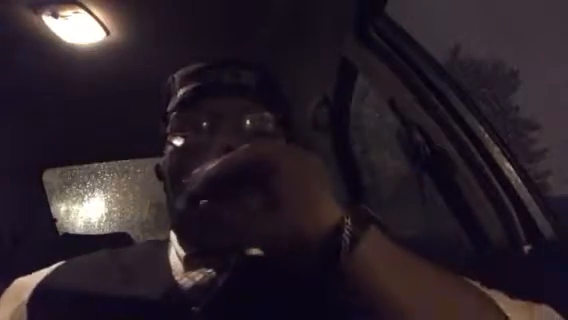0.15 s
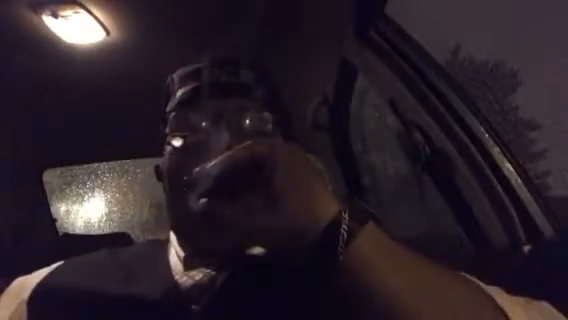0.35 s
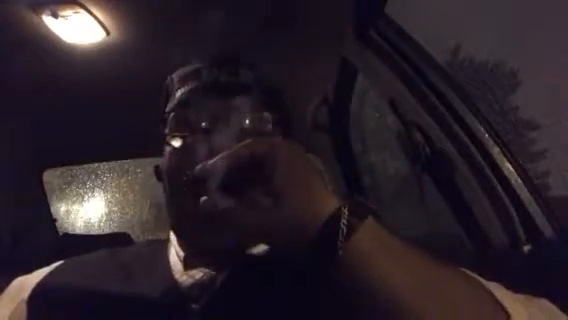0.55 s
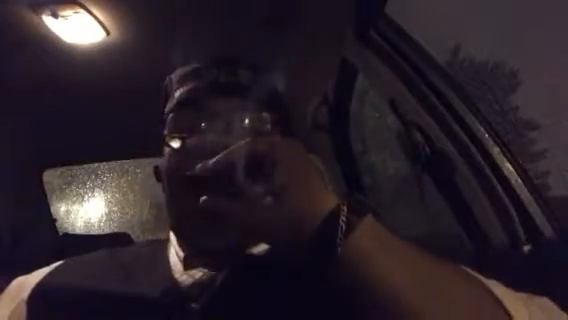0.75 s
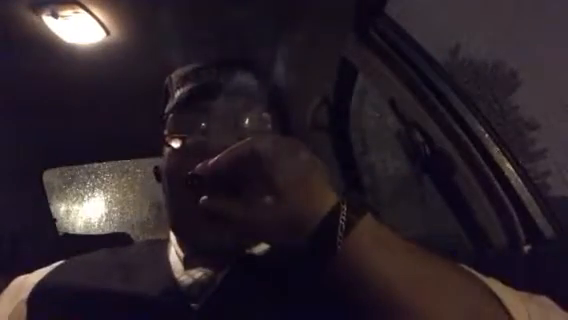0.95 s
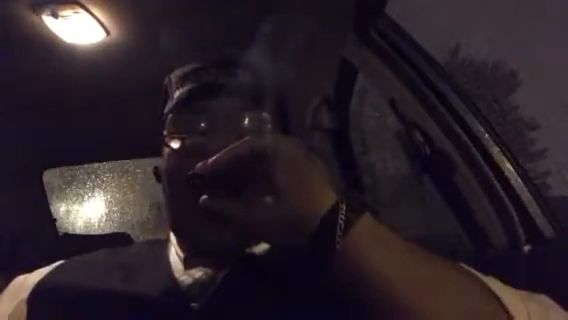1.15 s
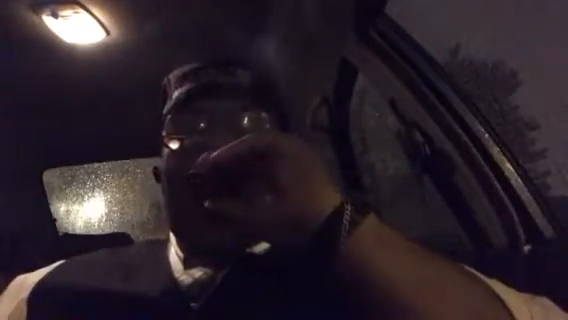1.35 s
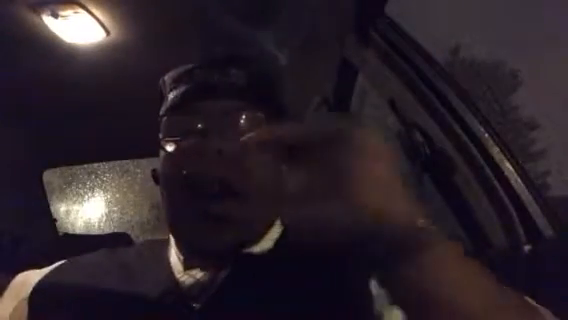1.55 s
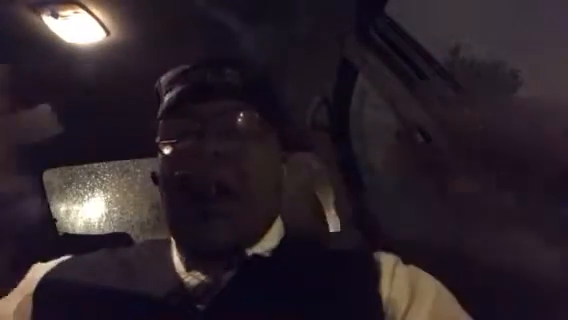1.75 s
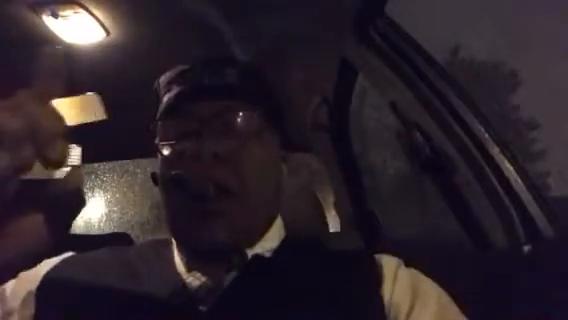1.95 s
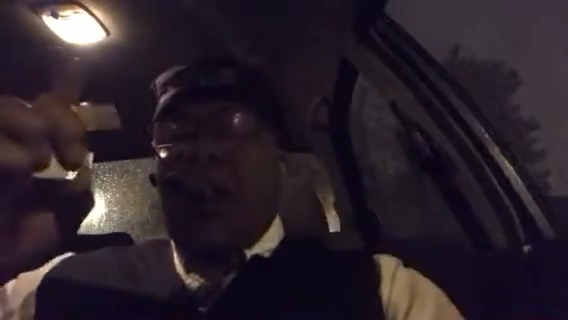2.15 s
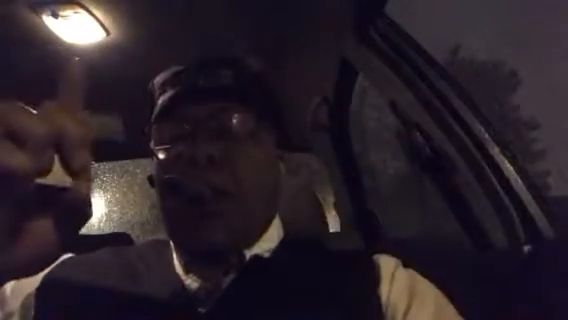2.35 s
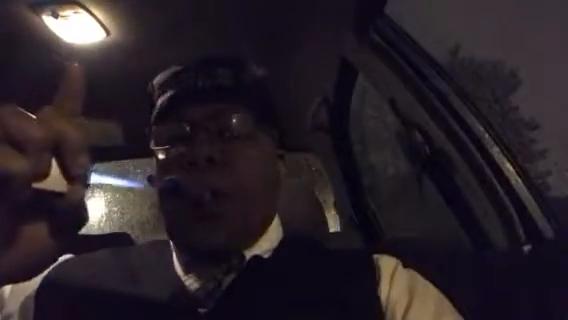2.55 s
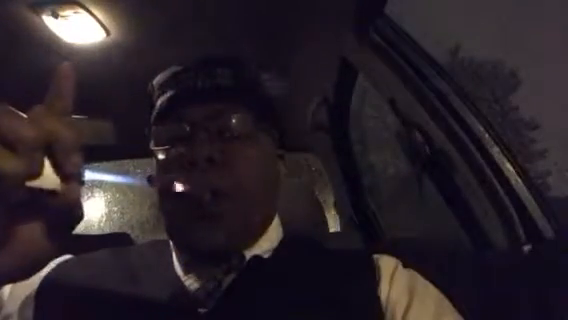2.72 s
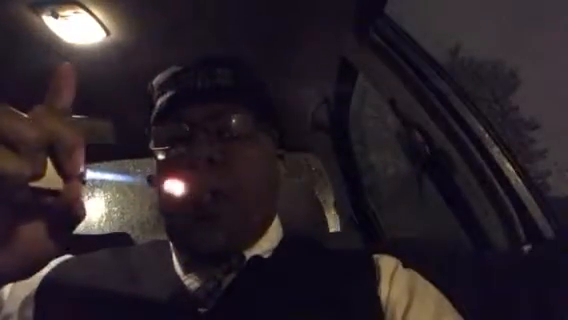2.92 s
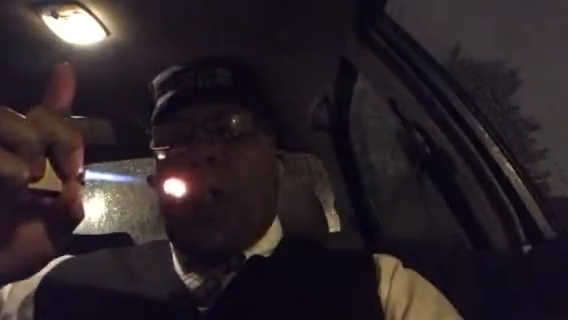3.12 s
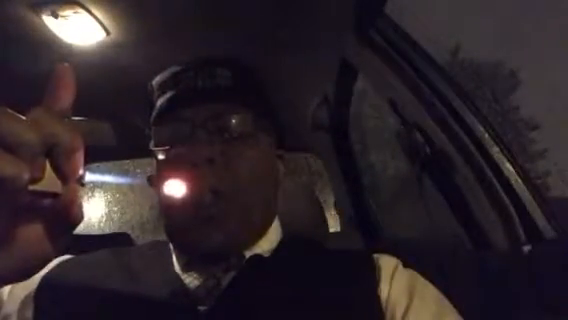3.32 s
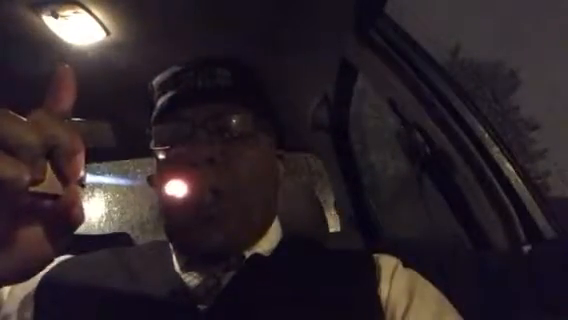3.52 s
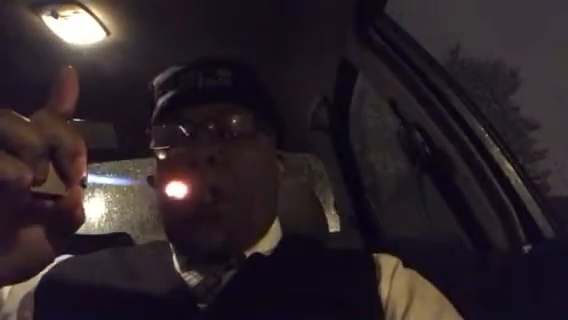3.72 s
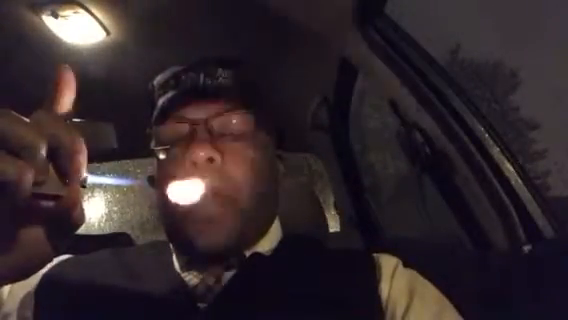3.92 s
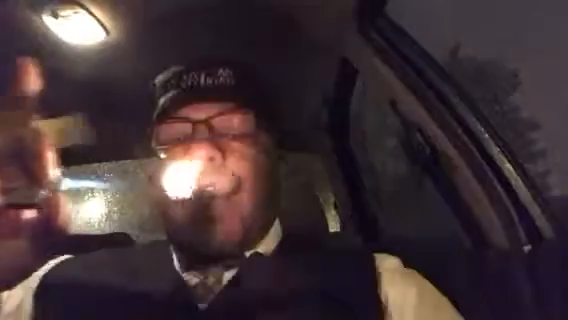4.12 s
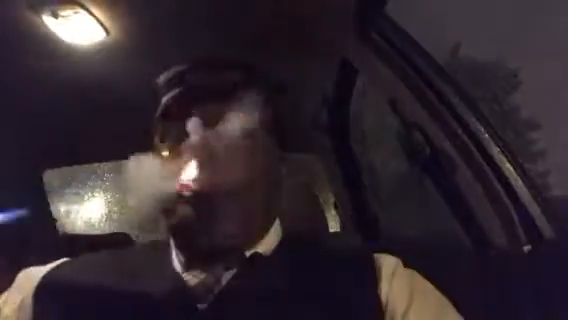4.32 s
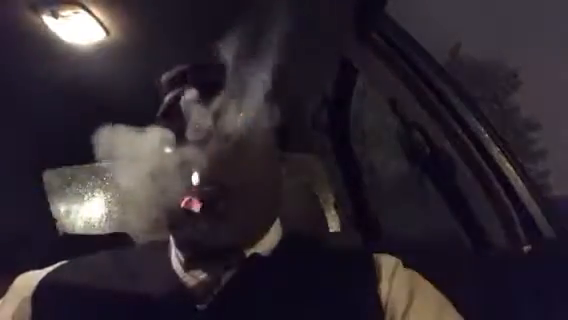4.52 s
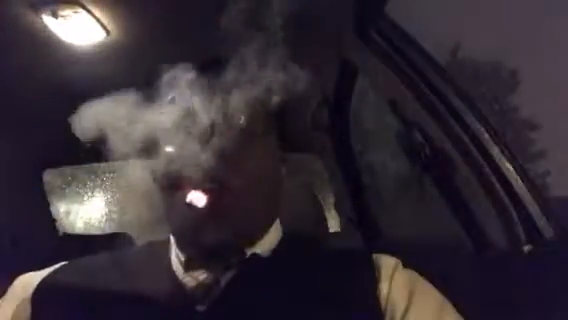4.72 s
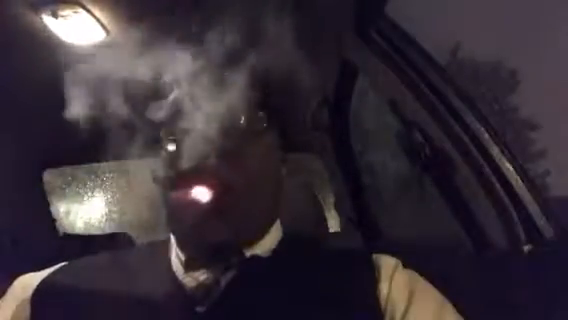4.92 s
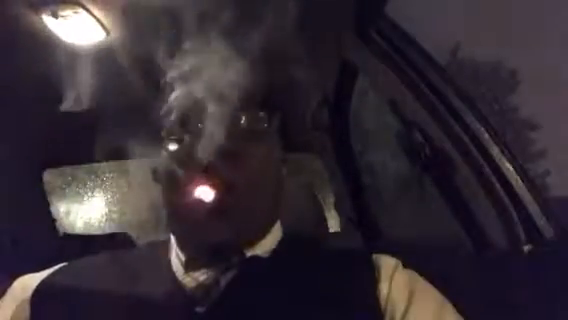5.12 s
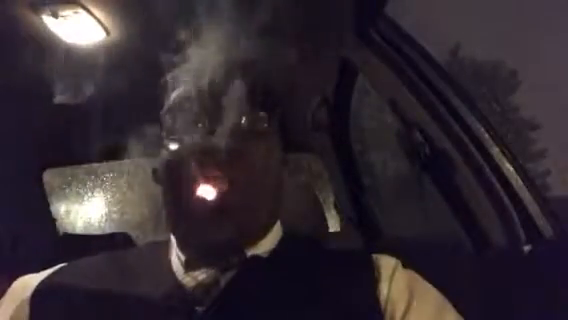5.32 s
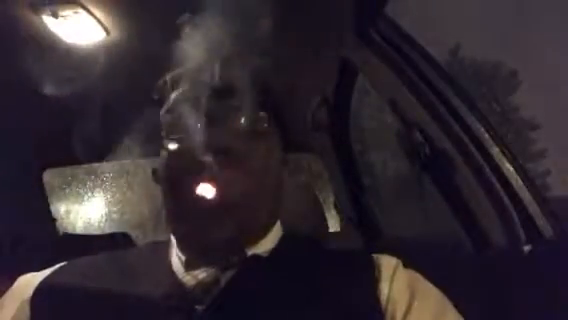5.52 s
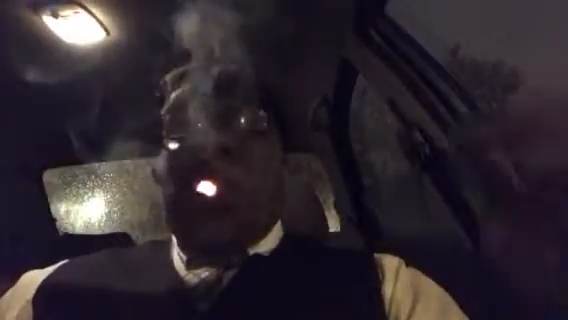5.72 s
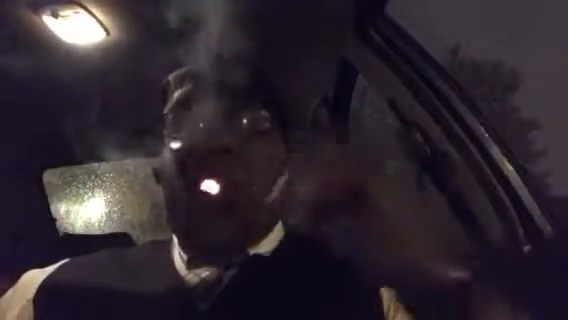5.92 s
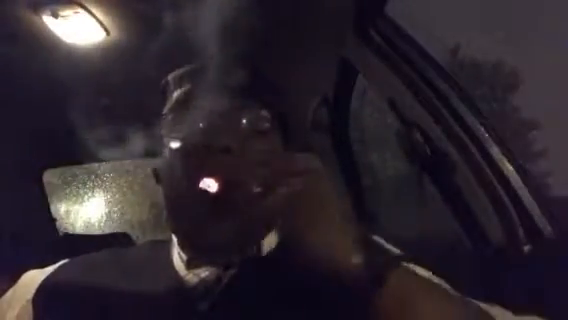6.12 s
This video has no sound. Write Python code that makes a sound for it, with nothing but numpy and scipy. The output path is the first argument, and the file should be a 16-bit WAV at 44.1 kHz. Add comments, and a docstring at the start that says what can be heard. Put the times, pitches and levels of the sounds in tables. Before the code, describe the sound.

Close up inside a quiet parked car with faint low traffic rumble, small gritty ticks lead to a bright ringing click of a metal lighter lid. Cloth rustles very softly. A thin high gas hiss opens, then a louder, sharp igniter snap starts a steady breathy torch roar. A light catch click follows as the lighter is lowered; the flame dulls, fades and stops, leaving the hushed cabin.

```python
"""Inside a parked car at night, a metal torch lighter is opened, lit, lowered and put out.
Traffic rumble, hush, rustles and faint whines are shaped noise and drifting sines.
Ticks are resonant grit; the snaps of lid, igniter and catch join noise bursts to damped metal modes.
The valve's hiss and the flame's roar are turbulent noise coloured by interfering paths, which shift
as the lighter is lowered."""
import sys
import numpy as np
from scipy import signal
from scipy.fft import rfft, irfft, next_fast_len
from scipy.io import wavfile
from scipy.ndimage import uniform_filter1d, map_coordinates

SR = 44100
rng = np.random.default_rng(int(sys.argv[2]) if len(sys.argv) > 2 else 0)


def pcm_store(signal):
    """Save signal as 16-bit PCM."""
    levels = np.round(np.clip(np.atleast_2d(signal), -1, 1) * 32767)
    wavfile.write(sys.argv[1], SR, levels.astype(np.int16).T)


N = 271944
T = np.arange(N) / SR  # time [s]

# Mechanical snaps of lid, igniter and catch; the second also lights the gas: t/s, snap level/dB, snap f/Hz,
# fizz level/dB, fizz f/Hz, ping f/Hz, then thump, grip, shell, case and lid level/dB
SNAPS = [(0.5236, -28, 6530, -24.5, 14230, 7060, -39, -34.5, -17, -29.5, -21.5),
         (2.5080, -20.5, 3920, -21, 10830, 9600, -23, -12.5, -14, -34, -41),
         (4.1596, -29.5, 3860, -30.5, 13200, 12670, -42, -27.5, -56, -41.5, -65)]


def amp(db):
    """Level to amplitude: 20 dB is a factor of ten."""
    return 10 ** (np.asarray(db) / 20)


def unit(x):
    """Normalisation to unit root-mean-square amplitude."""
    return x / np.sqrt(np.mean(x ** 2) + 1e-20)


def along(points, hz):
    """Spectral envelope: level interpolated between (f, dB) points over log frequency."""
    f, db = np.transpose(points)
    return amp(np.interp(np.log(hz + 1), np.log(f + 1), db, -120, -120))


def gains(rows):
    """Temporal envelope: one gain per dB column, practically silent outside the rows."""
    s, *columns = np.transpose(rows)
    return [amp(np.interp(T, s, db, -140, -140)) for db in columns]


def wobble(rate):
    """Band-limited random modulation: a smooth curve through `rate` random knots per second."""
    knots = rng.standard_normal(int(N * rate / SR) + 4)
    return map_coordinates(knots, [T * rate])


def filtered(x, response):
    """Linear filtering: the spectrum is multiplied by a frequency response."""
    m = next_fast_len(x.shape[-1] + 8192)
    spectrum = rfft(x, m) * response(np.fft.rfftfreq(m, 1 / SR))
    return irfft(spectrum, m)[..., :x.shape[-1]]


def rush(colour, patchy_db, size=1024):
    """Turbulent noise of unit rms: random time-frequency patches under colour(Hz, s)."""
    top_hz = 15740
    hz, s, z = signal.stft(rng.standard_normal(N), SR, nperseg=size)
    field = uniform_filter1d(rng.standard_normal(z.shape), size=12, axis=0)
    field = uniform_filter1d(field, size=5, axis=1)
    z = z * amp(patchy_db * unit(field))
    z = z * colour(hz[:, None], s) * (hz[:, None] < top_hz)
    return unit(signal.istft(z, SR, nperseg=size)[1][:N])


def resonance(f, hz, width_hz):
    """Driven damped oscillator: the causal band-pass response of one mode."""
    return 1j * f * width_hz / (hz * hz - f * f + 1j * f * width_hz)


def comb(modes, f):
    """Incoherent superposition: steep-sided humps (f, width, dB) add as power."""
    humps = [amp(db) / (1 + (2 * (f - hz) / width) ** 2) for hz, width, db in modes]
    return np.sqrt(sum(hump ** 2 for hump in humps))


def held(modes, hz, stretch, nulls=()):
    """Interference at one position: humps and nulls scale in frequency as the hand moves."""
    grid = np.arange(0, SR, 4)
    gain = comb(modes, grid)
    for null_hz, width_hz in nulls:
        gain = gain * (1 - .65 / (1 + (2 * (grid - null_hz) / width_hz) ** 2))
    return np.interp(hz * stretch, grid, gain)


def ringing(modes, t):
    """Free vibration: exponentially damped sines with random phases and slightly varied strengths."""
    sound = np.zeros(len(t))
    for hz, db, t60 in modes:
        level_db = db + rng.normal(0, 1.5)
        sound += amp(level_db - 60 * t / t60) * np.sin(2 * np.pi * (hz * t + rng.random()))
    return sound


def road_rumble():
    """Transmission through the car body: low-frequency noise with slow level fluctuation."""
    # distant traffic: t/s, level/dB before the lumps
    traffic = [(0.0, -58), (.9, -60.5), (1.44, -58.5), (2.3, -56), (2.85, -58), (5.39, -58.5),
               (5.75, -56.5), (6.17, -57.5)]
    # rumble passed by the car body: f/Hz, relative level/dB per Hz
    body_spectrum = [(15, -42.5), (26, -11.5), (54, 2.5), (128, -3.5), (154, -4.5), (179, -14),
                     (205, -10.5), (232, -17), (290, -18), (381, -26.5), (500, -31.5), (650, -65),
                     (1100, -120)]
    lumps = amp(1.4 * wobble(6))
    noise = rush(lambda hz, s: along(body_spectrum, hz), patchy_db=.4, size=8192)
    return gains(traffic)[0] * lumps * noise


def air_hush():
    """Stationary background noise of air and microphone."""
    # colour of the hush: f/Hz, relative level/dB per Hz
    hush_spectrum = [(150, -27.5), (250, -8.5), (451, -14), (536, -12.5), (672, -11.5), (872, -14.5),
                     (951, -14), (1520, -17), (1840, -18), (2190, -20), (3620, -21.5), (4300, -21.5),
                     (4900, -26.5), (5600, -22.5), (9300, -27.5), (10400, -33), (11400, -29),
                     (15800, -33.5)]
    rms_db = -70.5
    return amp(rms_db) * rush(lambda hz, s: along(hush_spectrum, hz), patchy_db=0.1)


def whine():
    """Frequency and amplitude modulation: two thin tones drift in pitch and waver in strength."""
    # mean pitch of the two tones: f/Hz
    pitches = [1800, 2000]
    # amplitude of the two tones before wavering: level/dB
    levels = [-87, -84]
    # swells of the lower tone: t/s, width/s, rise in level/dB
    swells = [(.1, .2, 8), (5.55, .25, 5), (5.64, .05, 6)]
    swell_db = sum(db * np.exp(-((T - s) / width) ** 2) for s, width, db in swells)

    def tone(hz, db):
        """Phase is the running integral of frequency."""
        drifting_hz = hz + 18 * wobble(1.5) + 11 * wobble(14)
        return amp(db + 3.2 * wobble(9)) * np.sin(2 * np.pi * np.cumsum(drifting_hz) / SR)

    return tone(pitches[0], levels[0] + swell_db) + tone(pitches[1], levels[1])


def ticks():
    """Impulsive excitation of a resonance: hinge, valve and fingers give short gritty puffs."""
    # small contacts: t/s, peak level/dB, f/Hz
    contacts = [(.289, -64, 3000), (.440, -52, 2400), (0.446, -44.5, 2220), (.449, -45.5, 4770),
                (.453, -42, 4780), (.455, -50, 5730), (.457, -45, 1973), (0.463, -42.5, 2710),
                (.472, -55.5, 2800), (.484, -51, 2720), (.503, -57, 2200), (.537, -44, 1415),
                (.553, -47, 1350), (.557, -49.5, 2800), (1.957, -54, 760), (1.992, -60, 4120),
                (2.117, -50, 1690), (4.083, -43, 3780), (6.045, -65, 12600)]
    t60_s, width_hz, broadband_share = .03, 650, .02
    out, t = np.zeros(N + SR), np.arange(SR // 10) / SR
    for s, db, hz in contacts:
        grit = rng.standard_normal(len(t)) * rng.random(len(t)) ** 3  # the cube makes it sparse
        grit = amp(-60 * t / t60_s) * grit
        tick = filtered(grit, lambda f: broadband_share + resonance(f, hz, width_hz) ** 3)
        out[round(s * SR):][:len(t)] += amp(db) * tick / abs(tick).max()
    return out[:N]


def snaps():
    """Impact and modal response: noisy contacts, a low push, dull knocks and ringing metal."""
    # metal case: f/Hz, relative level/dB, t60/s
    case_modes = [(5405, -8, .049), (5692, -14, .2), (6762, 0, .1)]
    # lid, which rings freely only as it opens: f/Hz, relative level/dB, t60/s
    lid_modes = [(1319, -24, .11), (2062, -2, .083), (2110, -12, .05), (9313, -11, .059), (11490, -8, .035),
                 (12250, -11, .09), (12480, -18, .052), (13260, -12, .037), (14180, -2, .051),
                 (15020, -19, .064)]
    # hollow of the closed hand: f/Hz, relative level/dB, t60/s
    grip_modes = [(1630, 1.5, 0.03), (2050, -10, 0.026)]
    # thumb plate, dull under the grip: f/Hz, relative level/dB, t60/s
    shell_modes = [(2365, -2.5, 0.026), (2626, -2, 0.029), (2802, -0.5, 0.023), (3110, -10, 0.03)]
    snap_width_hz, fizz_width_hz, ping_db, thump_lag_s = 7100, 7000, -20, .004
    out, t = np.zeros(N + SR), np.arange(SR // 3) / SR
    rise = 1 - np.exp(-t / 0.00017)
    contacts, cabin_answer = np.exp(-(t / .0032) ** 2), amp(-13 - 60 * t / .055)
    blow = rise * (contacts + cabin_answer)
    for (s, snap_db, snap_hz, fizz_db, fizz_hz, ping_hz,
         thump_db, grip_db, shell_db, case_db, lid_db) in SNAPS:
        sound = np.zeros(len(t))
        colours = [(snap_db, snap_hz, snap_width_hz), (fizz_db, fizz_hz, fizz_width_hz)]
        for level_db, hz, width_hz in colours:
            noise = blow * rng.standard_normal(len(t))
            part = filtered(noise, lambda f: resonance(f, hz, width_hz) ** 3)
            onset_rms = np.sqrt(np.mean(part[:SR // 250] ** 2))  # over the first 4 ms
            sound = sound + amp(level_db) * part / onset_rms
        struck = [(ping_db, [(ping_hz, 0, .02)]), (grip_db, grip_modes), (shell_db, shell_modes),
                  (case_db, case_modes), (lid_db, lid_modes)]
        for level_db, modes in struck:
            sound = sound + rise * amp(level_db) * ringing(modes, t)
        sound = filtered(sound, lambda f: (1j * f / (900 + 1j * f)) ** 4)  # so small a body radiates no bass
        thump = amp(thump_db - 60 * t / 0.018) * (1 - np.exp(-t / 0.0011)) * np.sin(2 * np.pi * 135 * t)
        out[round(s * SR):][:len(t)] += sound
        out[round((s + thump_lag_s) * SR):][:len(t)] += thump
    return out[:N]


def sleeve():
    """Friction noise: cloth rustles with a fluctuating envelope."""
    # rustles: t/s, length/s, level/dB before the fluctuation
    rustles = [(1.606, 0.52, -76), (5.46, .05, -75), (5.525, .65, -80), (5.704, 0.2, -73.5)]
    # colour of rubbing cloth: f/Hz, relative level/dB per Hz
    cloth_spectrum = [(300, -15), (900, 2.5), (2000, -2.5), (4000, -7), (6500, -4), (9000, -18),
                      (15000, -10)]
    edge_s = .03
    moves = np.zeros(N)
    for s, length, db in rustles:
        inside_s = np.minimum(T - s, s + length - T)
        moves += amp(db) * np.clip(inside_s / edge_s + .5, 0, 1)
    noise = rush(lambda hz, s: along(cloth_spectrum, hz), patchy_db=1.5)
    return moves * amp(0.88 * wobble(37)) * noise


def valve_gas(sway):
    """Jet turbulence: unlit gas surges from the opened valve and settles until ignition."""
    # what hand, face and glass make of the unlit jet: f/Hz, width/Hz, relative level/dB
    unlit_humps = [(1610, 380, -6.0), (2510, 1500, -18.0), (3100, 360, -17.0), (3720, 350, -14.5),
                   (4350, 400, -8.0), (5290, 370, -8.5), (5930, 420, -8.5), (6620, 460, -12.5),
                   (7180, 230, -11.5), (7750, 540, -12.5), (8640, 430, -9.5), (9000, 290, -9.5),
                   (9650, 520, -0.5), (10290, 390, -9.0), (11040, 670, -4.5), (11780, 430, -5.0),
                   (12400, 540, -7.0), (13180, 1500, -7.5), (13790, 770, -7.0), (14720, 1500, -2.5)]
    open_s, rise_s, settled_db = 2.017, 0.038, -58
    surge_db, surge_decay_s = 4.5, 0.26
    since = np.maximum(T - open_s, 0)
    level = amp(settled_db + surge_db * np.exp(-since / surge_decay_s))
    flow = (1 - np.exp(-since / rise_s)) ** 2 * level * (T < SNAPS[1][0])
    return flow * rush(lambda hz, s: held(unlit_humps, hz, sway(s)), patchy_db=1.5)


def flame(sway):
    """Combustion and nozzle turbulence: a fluttering roar below 8 kHz and a hiss above it."""
    # course of the flame: t/s, roar level/dB, nozzle hiss level/dB, both before flutter
    course = [(2.508, -59.5, -62.5), (2.56, -52.5, -57), (2.64, -50.5, -57.5), (3.57, -49.5, -57),
              (4.05, -50, -57.5), (4.36, -54, -59), (4.5, -52, -61.5), (4.95, -56, -66.5),
              (5.27, -58.5, -66.5), (5.32, -66.5, -79), (5.36, -85, -88)]
    # what hand, face and glass make of the raised flame: f/Hz, width/Hz, relative level/dB
    raised_humps = [(220, 100, -4.0), (300, 110, -10.0), (820, 230, -2.0), (910, 120, 0.0),
                    (1010, 150, -2.0), (1410, 220, -4.5), (1670, 310, -0.5), (2260, 360, -8.0),
                    (2650, 70, -17.0), (3100, 250, -18.5), (3480, 240, -14.0), (3760, 260, -14.0),
                    (4110, 170, -19.0), (4450, 320, -11.5), (5180, 410, -15.5), (6020, 450, -19.0),
                    (6830, 950, -25.5), (7890, 440, -28.5), (8510, 650, -32.5), (9020, 260, -31.5),
                    (9660, 540, -28.0), (10310, 550, -31.0), (11050, 430, -23.0), (11890, 340, -23.5),
                    (12560, 580, -19.5), (13120, 310, -20.5), (13480, 160, -17.0), (13880, 400, -10.0),
                    (14540, 500, -8.0), (15290, 470, -13.0)]
    # the same for the lowered flame: f/Hz, width/Hz, relative level/dB
    lowered_humps = [(720, 420, -9.0), (1040, 110, -3.5), (1290, 220, 0.0), (1860, 1070, -8.5),
                     (2820, 420, -8.5), (3500, 380, -10.5), (4180, 540, -14.5), (4730, 330, -19.5),
                     (5280, 520, -17.0), (5840, 250, -23.5), (6150, 120, -24.5), (6460, 410, -22.0),
                     (6840, 160, -26.5), (7070, 950, -23.5), (8260, 490, -30.5), (8860, 610, -25.5),
                     (9380, 300, -29.5), (9910, 670, -25.5), (11190, 780, -20.0), (11930, 640, -16.0),
                     (12650, 910, -19.5), (13710, 900, -21.0), (14640, 230, -21.0), (15200, 1250, -23.0)]
    # standing wave of the cabin fed by the raised flame: f/Hz, width/Hz, relative level/dB
    cabin_mode = [(418, 55, 1)]
    # where echoes cancel the raised flame: f/Hz, width/Hz
    echo_nulls = [(555, 60), (1225, 70), (2575, 60), (2850, 90), (4800, 120), (5600, 120)]
    lower_s, lower_length_s, turn_s = 4.14, 0.6, 0.13  # the nozzle turns aside sooner than the hand is down
    echo_from_ms, echo_to_ms, echo_share = .8, 1.6, 0.13  # a passing echo on the way down

    def colour(hz, s, is_hiss, slide):
        """Path-length interference: one comb slides down in frequency and melts into the other."""
        way = np.clip((s - lower_s) / lower_length_s, 0, 1)
        if is_hiss:
            down = 1 - np.exp(-np.maximum(s - lower_s, 0) / turn_s)
        else:
            down = np.sin(np.pi / 2 * way) ** 2
        raised = held(raised_humps, hz, sway(s) * (1 + slide * down), echo_nulls) ** 2
        raised = raised + comb(cabin_mode, hz) ** 2
        lowered = held(lowered_humps, hz, sway(s) / (1 + slide * (1 - down))) ** 2
        power = (1 - down) * raised / raised.mean(0) + down * lowered / lowered.mean(0)
        below = 1 / (1 + (hz / 8000) ** 8)
        gain = np.sqrt(power) * (1 - below if is_hiss else below)
        echo_ms = echo_from_ms + (echo_to_ms - echo_from_ms) * way
        echo = echo_share * np.sin(np.pi * way)
        gain = gain * abs(1 + echo * np.exp(2j * np.pi * hz * echo_ms / 1000))
        return gain / np.sqrt(np.mean(gain ** 2, axis=0))  # colour moves, its mean power does not

    roar, hiss = gains(course)
    burn = rush(lambda hz, s: colour(hz, s, is_hiss=False, slide=0.23), patchy_db=1.07, size=2048)
    nozzle = rush(lambda hz, s: colour(hz, s, is_hiss=True, slide=0.11), patchy_db=2.3)
    flutter = amp(0.29 * wobble(9) + 0.94 * wobble(70))
    return roar * flutter * burn + hiss * amp(0.55 * wobble(12)) * nozzle


def jet():
    """Shared geometry: the unsteady hand stretches the spectra of gas and flame alike."""
    tremor = wobble(3)

    def sway(s):
        """Frequency scaling by small changes of path length."""
        return 1 + .003 * np.interp(s, T, tremor)

    return valve_gas(sway) + flame(sway)


def scene():
    """Linear superposition of cabin and lighter at one microphone."""
    cabin = road_rumble() + air_hush() + whine() + sleeve()
    return (cabin + ticks() + snaps() + jet())[None]


def record(dry):
    """Band limitation: the microphone loses the deepest bass and the treble falls to zero."""
    top_hz = 16984

    def response(hz):
        """High-pass and low-pass gains multiply."""
        bass = 1 / (1 + (36 / (hz + 1)) ** 4)
        return bass * np.clip((top_hz - hz) / 1250, 0, 1) ** 5

    return filtered(dry, response)


dry = scene()
out = record(dry)
pcm_store(out)
```